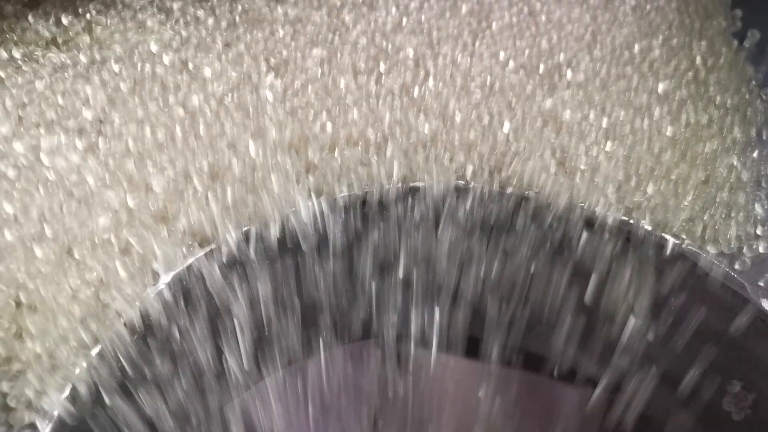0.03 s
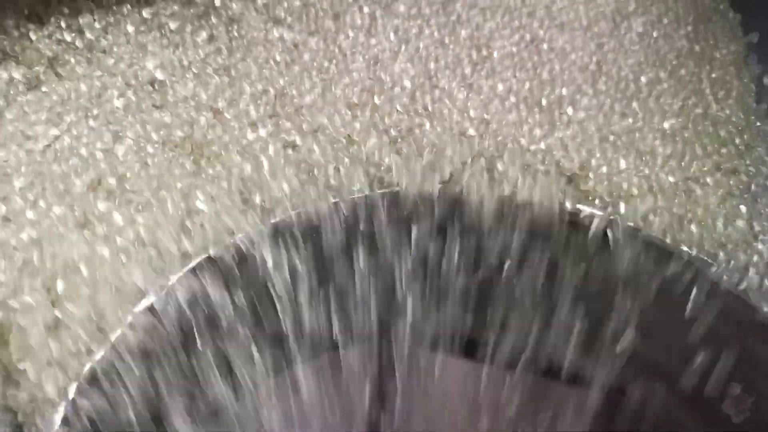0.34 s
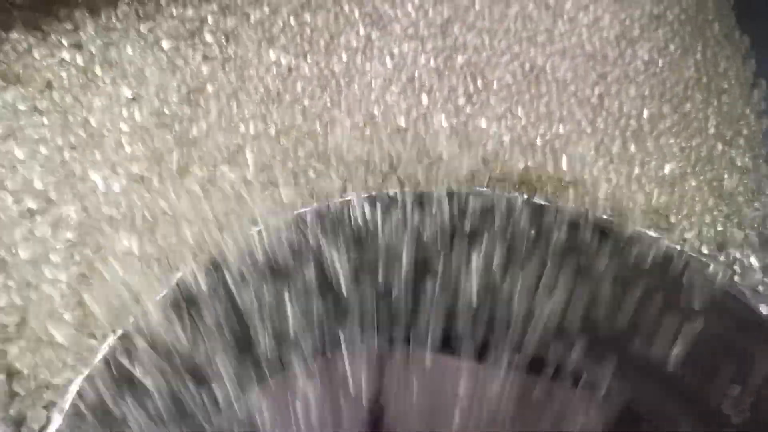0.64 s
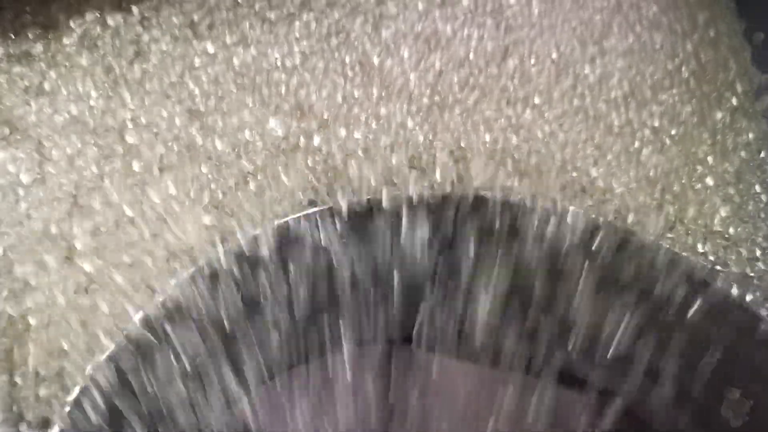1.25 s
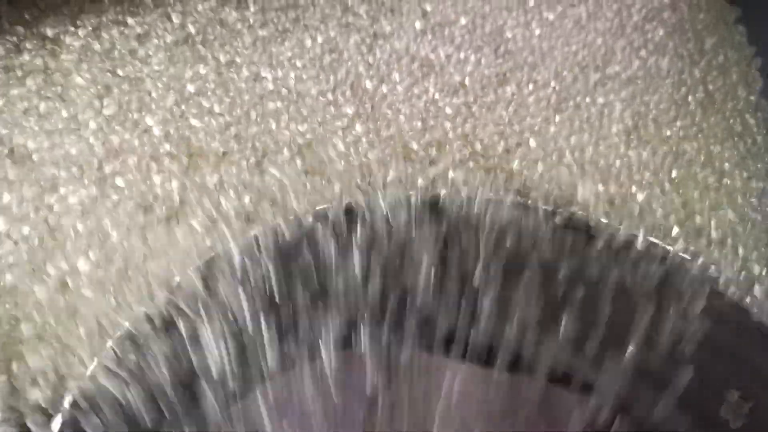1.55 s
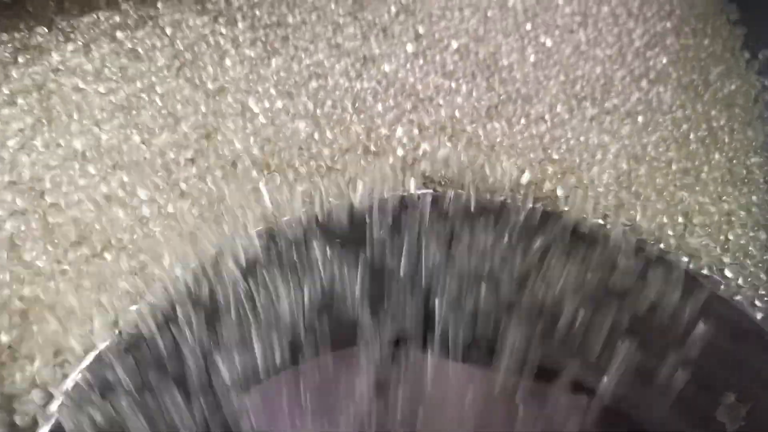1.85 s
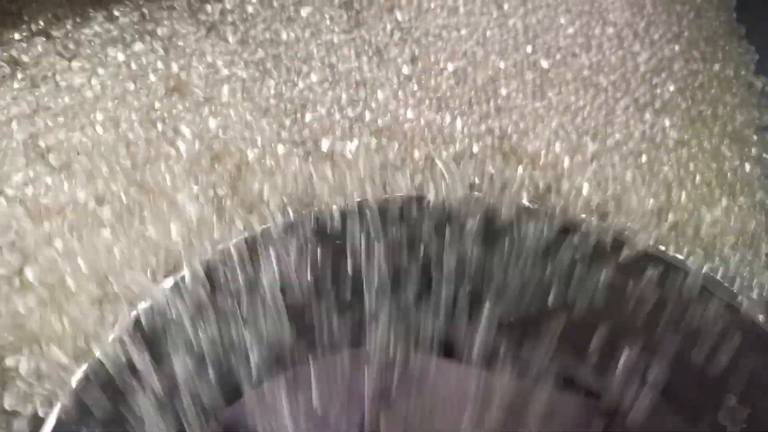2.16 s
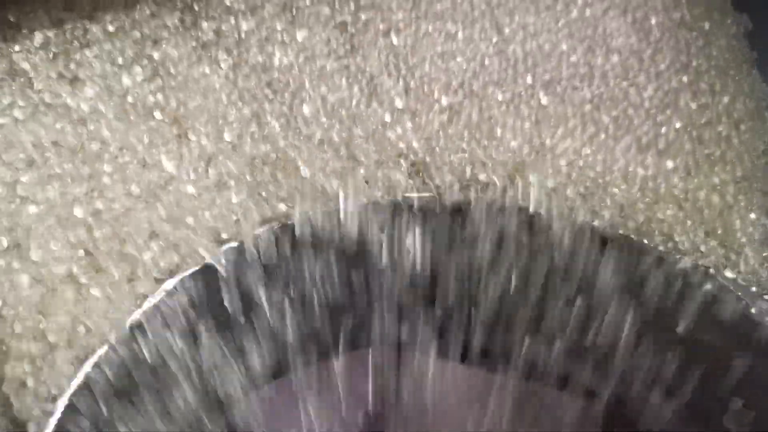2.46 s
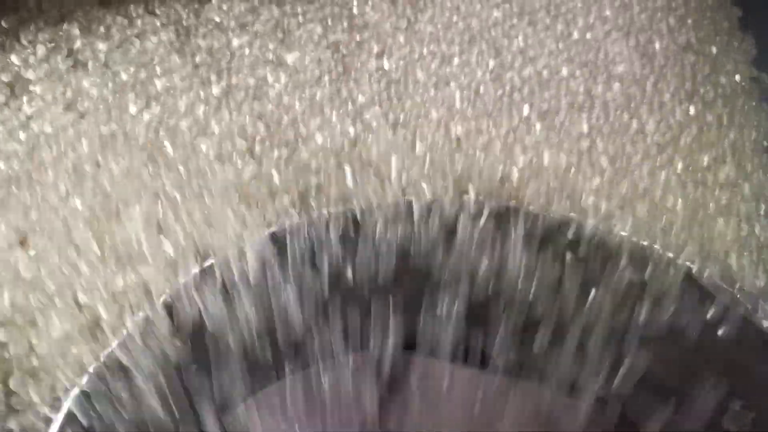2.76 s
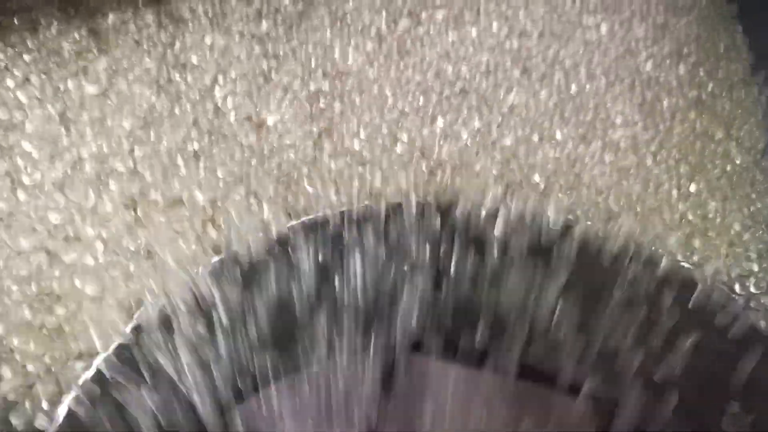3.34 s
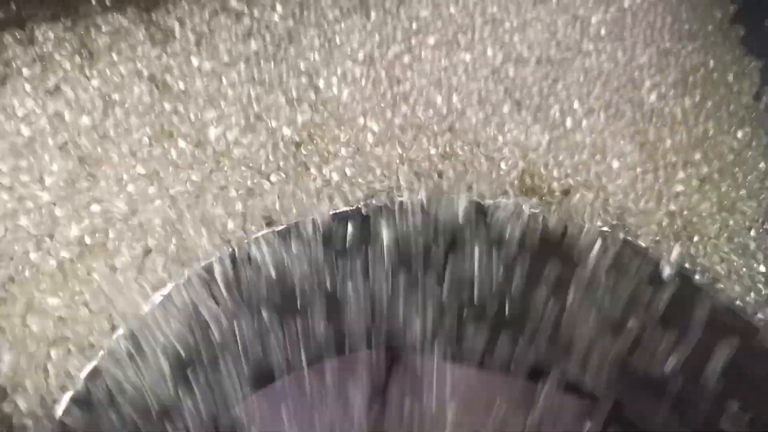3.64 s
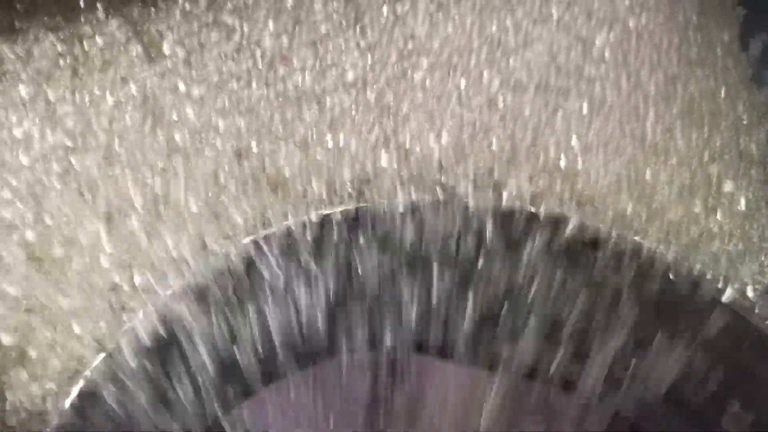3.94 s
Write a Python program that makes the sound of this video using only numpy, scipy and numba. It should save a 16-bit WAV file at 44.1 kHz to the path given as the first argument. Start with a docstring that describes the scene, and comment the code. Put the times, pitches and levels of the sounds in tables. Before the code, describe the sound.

Plastic pellets pour over a steel hopper rim, a close, dense hiss that starts abruptly at 0.3 seconds and runs until 4 seconds, with a faint metallic ring. A brief dull rub touches the microphone on the left, fading by 0.8 seconds. On that side a hollow resonance slides down through the hiss until about 1.5 seconds, then holds. Factory machinery rumbles low behind throughout.

```python
"""A rushing hiss cuts in abruptly: plastic pellets streaming over the rim of a steel hopper, close by.
Thousands of tiny impacts a second merge at the stereo microphone, and the steel rings faintly in them.
On the left, with a brief rub, a hollow resonance slides down through the hiss, probably a hand closing
round the microphone port. Behind it all, machinery rumbles on the factory floor."""
import sys
import numpy as np
from scipy import signal
from scipy.fft import rfft, irfft
from scipy.io import wavfile
from numba import njit

SR = 44100
rng = np.random.default_rng(int(sys.argv[2]) if len(sys.argv) > 2 else 0)


def to_wav(sig):
    """Store sig (one row per channel, or 1-D mono) as 16-bit WAV at the path in sys.argv[1].

    Samples outside -1..1 are clipped; the rate is SR.
    """
    pcm = np.clip(np.atleast_2d(sig), -1, 1) * 32767
    pcm = np.round(pcm).astype(np.int16)
    wavfile.write(sys.argv[1], SR, pcm.T)  # frames by channels


N = 176400
BIN_HZ = np.arange(N // 2 + 1) * SR / N
LOG_HZ = np.log(np.maximum(BIN_HZ, 1))


# Swell of the stream at the hopper: t/s, level/dB
STREAM_LEVEL = [(.31, 0.5), (.5, -0.6), (.65, -2), (.9, -3), (1.2, -1.5), (1.45, -3), (1.57, -2.5),
                (1.61, -1.3), (2.0, -1.2), (2.6, -0.5), (3.3, -0.03), (4.0, -0.5)]
# Ring of the hopper's steel: f/Hz, width/Hz, lift/dB
STEEL_MODES = [(470, 25, 6), (590, 35, 4), (695, 35, 6), (780, 25, 5), (964, 25, 7), (1170, 40, 3),
               (2664, 55, 6), (3070, 40, 2.5), (3262, 22, 6), (3712, 35, 3), (3971, 40, 3), (4349, 18, 4.5),
               (4802, 27, 3.5), (5310, 14, 4.5), (5808, 26, 6), (6211, 35, 4), (6658, 50, 2.5)]
# Base colour of the stream at each microphone port: f/Hz, level/dB per Hz
LEFT_SPECTRUM = [(200, -78.5), (600, -71), (1000, -69.5), (1450, -68.5), (1650, -64), (2400, -65),
                 (2700, -63.5), (4200, -63), (5200, -61), (6600, -61), (7600, -61), (8250, -69),
                 (9300, -73), (10000, -77), (12400, -82.5), (15000, -80)]
RIGHT_SPECTRUM = [(200, -73), (600, -73), (1050, -71), (1400, -72), (1950, -73.5), (2700, -69),
                  (3400, -70.5), (4250, -72.5), (5000, -66.5), (6500, -65.5), (7500, -56), (8250, -67.5),
                  (9300, -68.5), (10100, -79.5), (12700, -77.5), (15000, -82.5)]

def pellets(flutter_db=0.33, flutter_hz=9.8):
    """The slightly uneven stream strikes the hopper and reaches each port with its own colour."""
    level_db, = in_time(STREAM_LEVEL)
    hail = at_ports(np.array([impacts() for _ in range(3)]))
    flow = from_db(level_db + flutter_db * drift(flutter_hz))
    left, right = ringing(hail * flow, STEEL_MODES)
    return np.array([cupped_hand(coloured(left, LEFT_SPECTRUM)), coloured(right, RIGHT_SPECTRUM)])


def impacts(per_second=19000, spread_db=2.5, range_db=13):
    """Pellets land in a dense random hail of clicks, mostly small, a few large; rms 1."""
    size_db = np.minimum(spread_db * rng.exponential(1, N), range_db)
    sizes = from_db(size_db) * rng.choice([-1, 1], N)
    clicks = sizes * (rng.random(N) < per_second / SR)
    return clicks / clicks.std()


# Top of the hiss at both ports: t/s, level/dB
TREBLE_LEVEL = [(.31, .5), (.7, 0), (1.0, -0.5), (1.5, -3), (1.9, 2), (2.6, 1), (4.0, 0)]

def treble_dip(hiss, above_hz=8100):
    """The top of the hiss dulls for a while and recovers."""
    level_db, = in_time(TREBLE_LEVEL)
    treble = signal.sosfiltfilt(signal.butter(2, above_hz, "high", fs=SR, output="sos"), hiss)
    return hiss + (from_db(level_db) - 1) * treble


# Gliding resonance of the hollow at the left port: t/s, f/Hz, lift/dB, width/Hz
HOLLOW_GLIDE = [(.31, 6750, 5, 1800), (.45, 6650, 7.5, 1800), (.54, 6150, 10.5, 1210), (.64, 5270, 14, 855),
                (.76, 4700, 12.5, 704), (.85, 4190, 13, 620), (1.1, 4090, 14, 480), (1.3, 3920, 14.5, 402),
                (1.55, 3800, 14, 390), (1.7, 3950, 12.5, 430), (2.0, 4040, 11.5, 686), (3.0, 4020, 10, 730),
                (4.0, 3960, 10, 750)]
# Its two side resonances, steady in pitch: t/s, lower lift/dB, upper lift/dB
HOLLOW_SIDES = [(.31, -2.5, 0.5), (.65, 1, 1), (.9, 5.5, 2.5), (1.3, 5.5, 1.5), (1.75, 6.5, 0.5),
                (1.95, 6, 3), (4.0, 5, 3.5)]

def cupped_hand(x, lower_hz=3055, lower_width_hz=710, upper_hz=6160, upper_width_hz=1050):
    """The hollow round the left port resonates in one gliding band and two steady ones."""
    glide_hz, glide_db, glide_width_hz = in_time(HOLLOW_GLIDE)
    lower_db, upper_db = in_time(HOLLOW_SIDES)
    for hz, width_hz, lift_db in ((glide_hz, glide_width_hz, glide_db),
                                  (lower_hz, lower_width_hz, lower_db),
                                  (upper_hz, upper_width_hz, upper_db)):
        band = moving_band(x, hz * np.ones(N), width_hz * np.ones(N))
        x = x + (from_db(lift_db) - 1) * band
    return x


# Rub right on the microphone: t/s, level/dB
RUB_FADE = [(.31, -7.5), (.39, 0), (.5, -2.5), (.64, -5.5), (.8, -16), (1.1, -26), (1.4, -60)]
# Its colour at its loudest: f/Hz, level/dB per Hz
RUB_SPECTRUM = [(20, -57), (100, -50), (250, -57.5), (500, -61), (1100, -61), (2000, -73), (5000, -81)]

def hand_rub():
    """The hand brushes the left port only: brief, dull friction noise."""
    level_db, = in_time(RUB_FADE)
    rub = from_db(level_db) * coloured(rng.standard_normal(N), RUB_SPECTRUM)
    return np.array([rub, np.zeros(N)])


# Base colour of the machinery in the background: f/Hz, level/dB per Hz
MACHINE_SPECTRUM = [(20, -73.5), (50, -70.5), (120, -67.5), (190, -66.5), (320, -67.5), (390, -73),
                    (700, -75.5), (1500, -95), (4000, -110)]
# Boom of its housing: f/Hz, width/Hz, lift/dB
MACHINE_MODES = [(111, 10, 2.6), (218, 17, 5.35), (273, 10.7, 9.9), (305.6, 26, 5.6), (339, 5.6, 1.33)]
# Its slow swell: t/s, level/dB
MACHINE_LEVEL = [(.31, -0.5), (.9, -3), (1.5, -0.5), (1.7, -1), (2.6, -0.6), (4.0, 1.5)]

def machinery(pan_db=2.5):
    """A low rumble booms in the machine's housing, left of centre."""
    level_db, = in_time(MACHINE_LEVEL)
    rumble = coloured(at_ports(rng.standard_normal((3, N))), MACHINE_SPECTRUM)
    return ringing(rumble, MACHINE_MODES) * from_db(level_db) * from_db([[pan_db], [-pan_db]])


# Sound heard alike at both microphone ports: f/Hz, share of power/0-1
PORT_COHERENCE = [(30, 0.1), (100, 0.75), (260, .88), (450, 0.73), (1100, 0.68), (1450, .12), (3200, 0.22),
                  (4300, 0.17), (6100, 0.23), (7500, .3), (8800, 0.54), (10500, 0.19)]

def at_ports(three_signals, right_lag_s=0.000098):
    """Left and right from one common and two separate signals; the right port hears a little later."""
    share = in_frequency(PORT_COHERENCE)
    spectra = rfft(three_signals)
    sides = np.sqrt(share) * spectra[0] + np.sqrt(1 - share) * spectra[1:]
    delay = np.exp(-2j * np.pi * BIN_HZ * np.array([[0], [right_lag_s]]))
    return irfft(sides * delay, N)


def from_db(db):
    """Decibels to gain."""
    return 10 ** (np.asarray(db) / 20)


def in_time(rows):
    """Each column of a time curve at every sample."""
    times, *columns = np.transpose(rows)
    return [np.interp(np.arange(N) / SR, times, column) for column in columns]


def in_frequency(rows):
    """A frequency curve at every bin, joined along a log axis."""
    hz, values = np.transpose(rows)
    return np.interp(LOG_HZ, np.log(hz), values)


def coloured(white, spectrum):
    """Gives a white signal of rms 1 a spectrum in dB per Hz."""
    return irfft(rfft(white) * from_db(in_frequency(spectrum)), N) * np.sqrt(SR / 2)


def drift(rate_hz):
    """A slow random wander with a spread of 1."""
    slow = irfft(rfft(rng.standard_normal(N)) / (1 + (BIN_HZ / rate_hz) ** 2), N)
    return (slow - slow.mean()) / slow.std()


def ringing(x, modes):
    """Adds the ring of narrow resonances to whatever excites them."""
    out = x
    for hz, width_hz, lift_db in modes:
        ring = signal.lfilter(*signal.iirpeak(hz, hz / width_hz, fs=SR), x)
        out = out + (from_db(lift_db) - 1) * ring
    return out


@njit
def moving_band(x, hz, width_hz):
    """A resonance of gain 1 whose centre and width can move."""
    out, low_state, band_state = np.zeros(len(x)), 0., 0.
    for i in range(len(x)):
        tuning, damping = np.tan(np.pi * hz[i] / SR), width_hz[i] / hz[i]
        band = (band_state + tuning * (x[i] - low_state)) / (1 + tuning * (tuning + damping))
        band_state = 2 * band - band_state
        low_state += 2 * tuning * band
        out[i] = damping * band
    return out


def scene():
    """Pellets in front, machinery behind, the hand at the microphone."""
    return treble_dip(pellets()) + machinery() + hand_rub()


def record(dry):
    """The microphone input opens abruptly; the highest treble is cut off steeply."""
    start_s, cutoff_hz = 0.3109, 15150
    opened = dry * (np.arange(N) / SR >= start_s) + 1e-18
    return signal.sosfilt(signal.ellip(12, .1, 80, cutoff_hz, fs=SR, output="sos"), opened)


dry = scene()
out = record(dry)
to_wav(out)
```